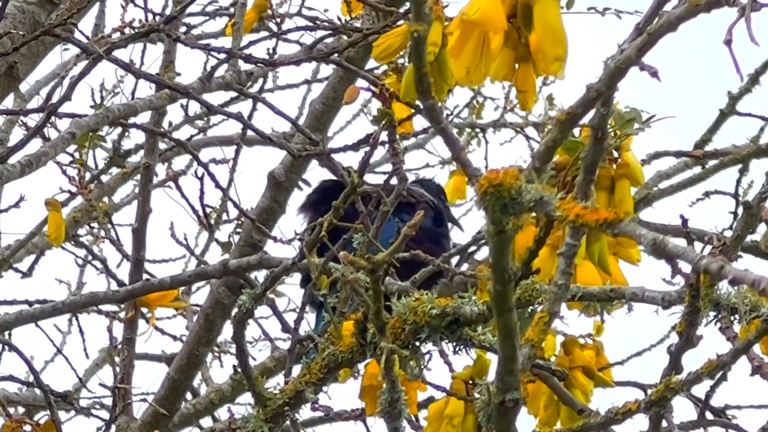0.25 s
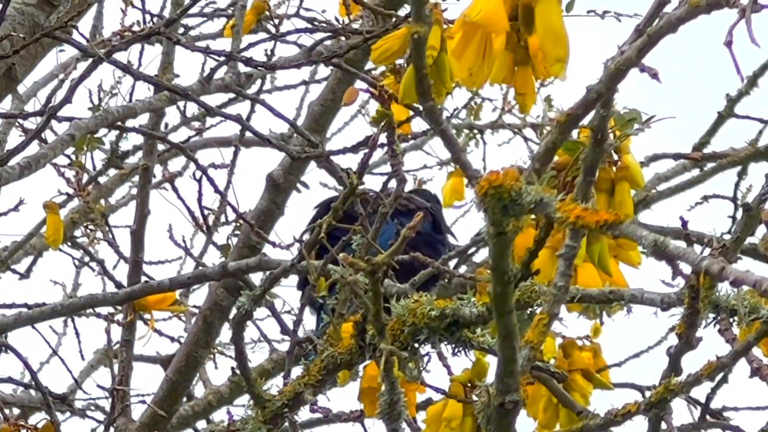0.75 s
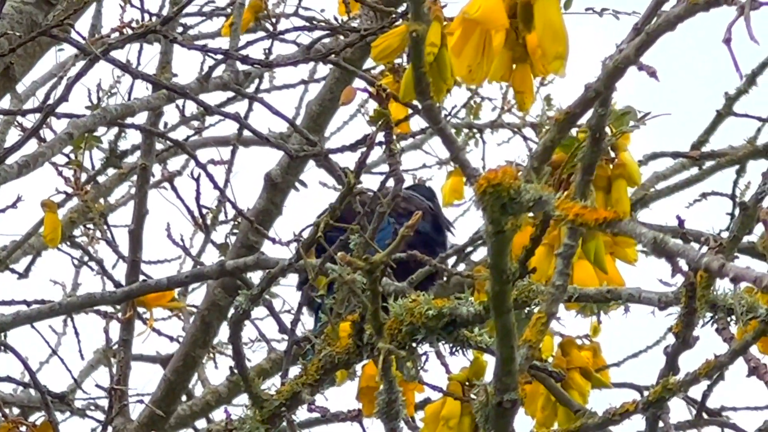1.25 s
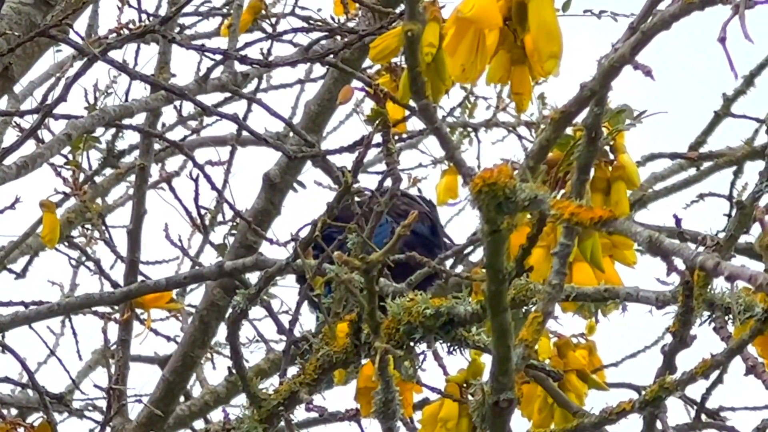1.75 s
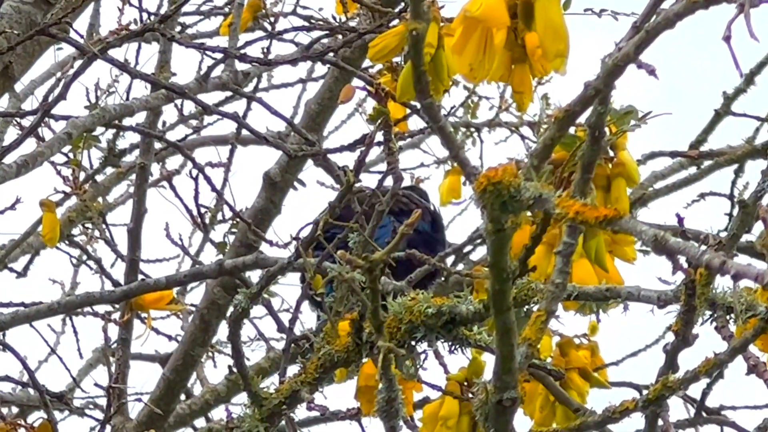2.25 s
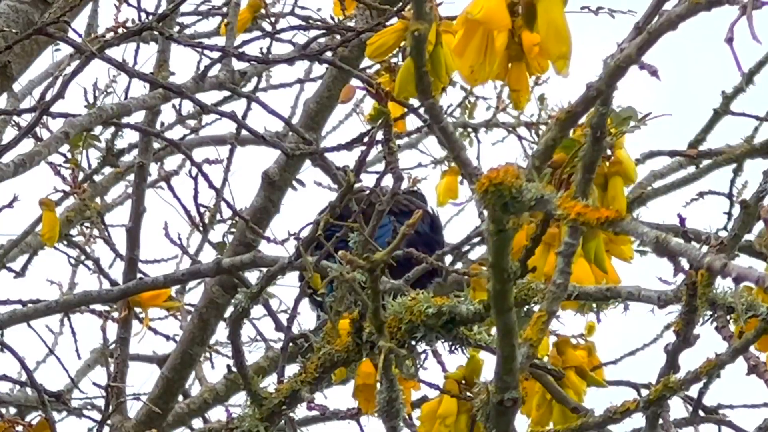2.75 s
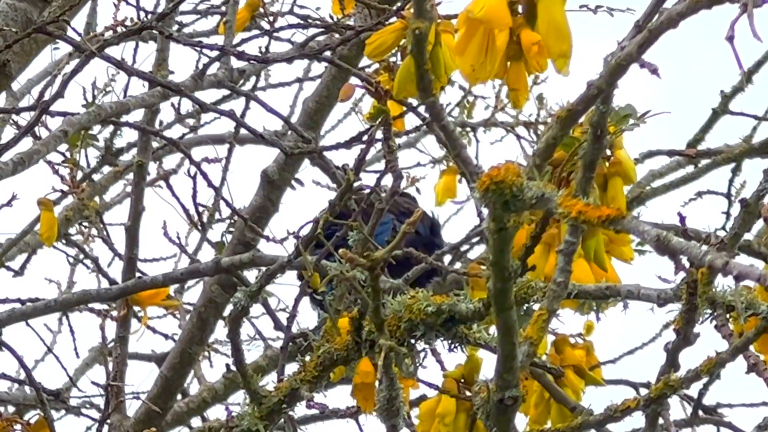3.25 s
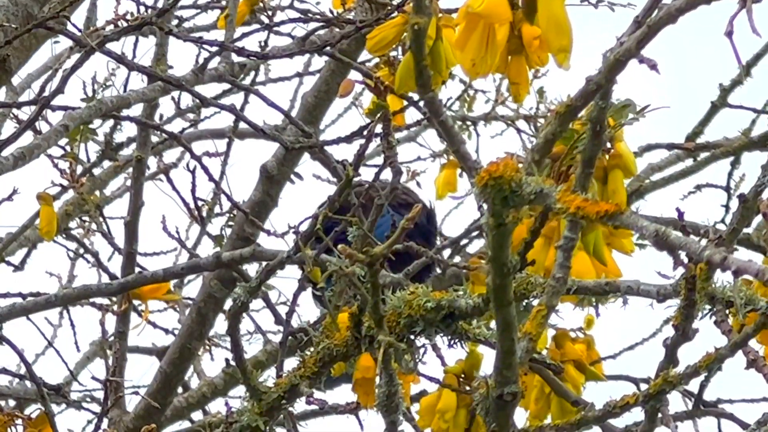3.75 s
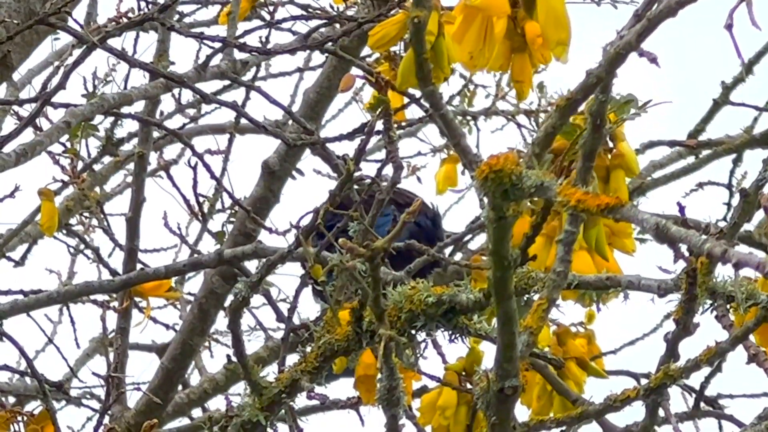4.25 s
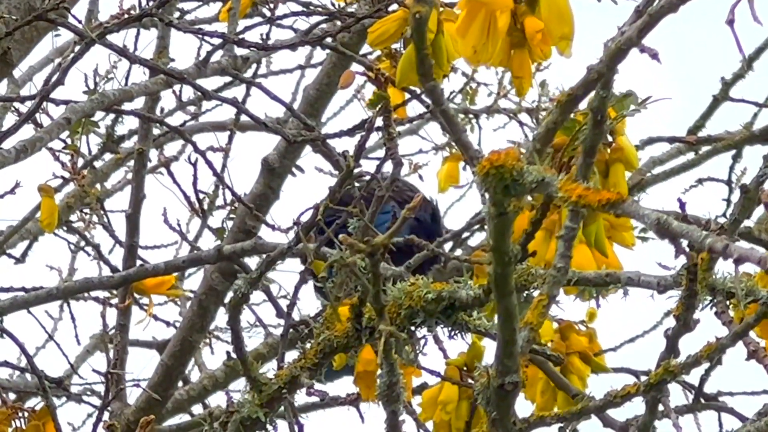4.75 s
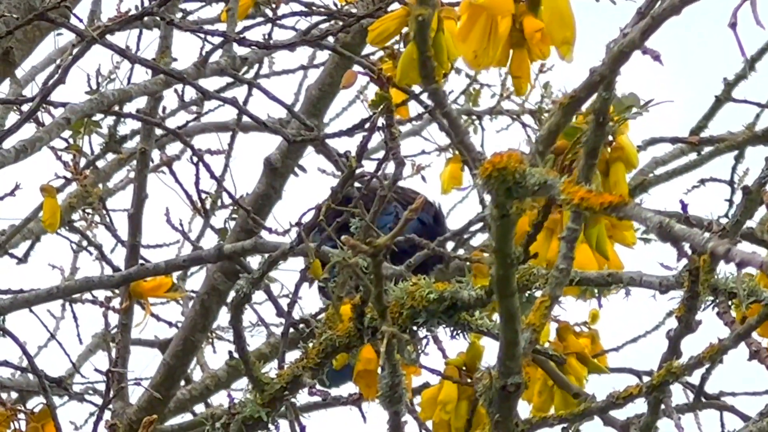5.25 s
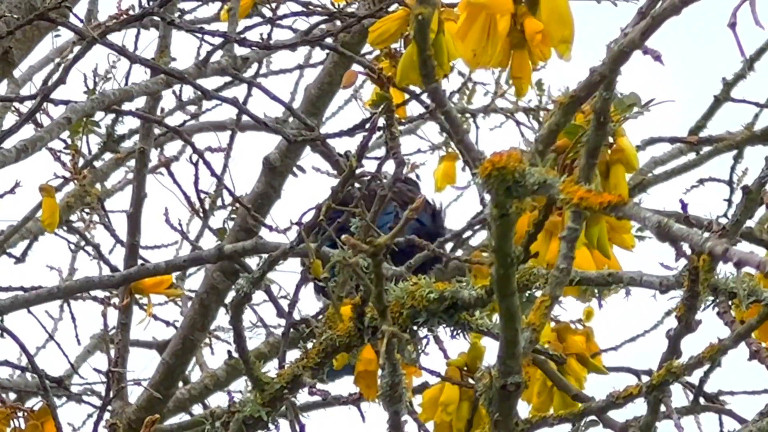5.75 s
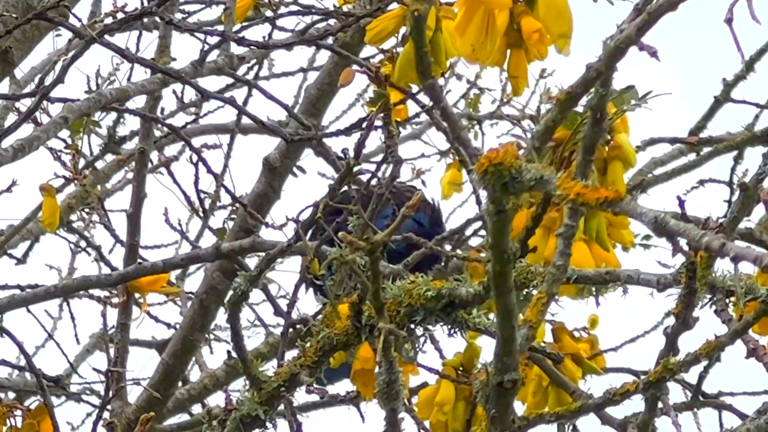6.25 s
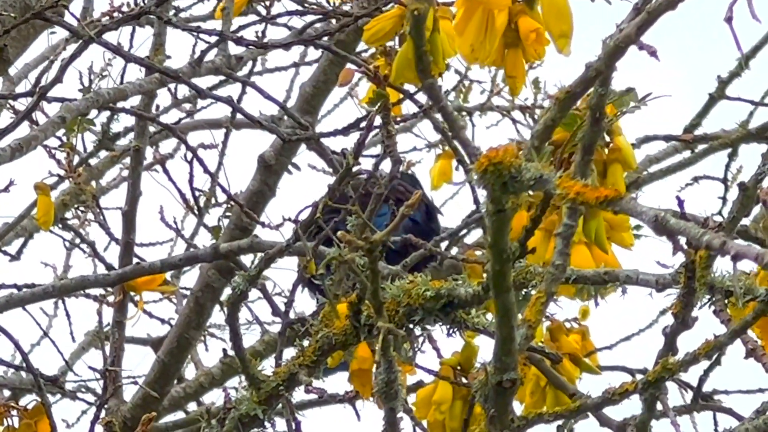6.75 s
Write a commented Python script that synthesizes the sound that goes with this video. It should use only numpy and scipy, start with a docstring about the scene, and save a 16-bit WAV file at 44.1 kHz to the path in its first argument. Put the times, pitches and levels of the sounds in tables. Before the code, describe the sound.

Outdoors in a tree, a bird delivers a rapid, ever-changing song of whistles, chirps, clicks, trills and one scratchy rasp, each briefly blurred by echoes from the branches. Gusts buffet the microphone with dull low thuds around the middle and again near the end, where the strongest comes. Noise suppression leaves the pauses very quiet over a barely audible rumble.

```python
"""In a tree outdoors, a songbird sings whistles, glides, trills and rasps, and the branches scatter them.
Its tones are gliding sine partials; its scrapes and rasp are noise filtered by resonances.
Wind buffets the microphone: gusts of low noise, with decaying sines as thumps, over a faint far rumble.
Noise suppression lowers weak treble and keeps the gaps almost silent."""
import sys
import numpy as np
from scipy import signal
from scipy.fft import rfft, irfft
from scipy.io import wavfile
from scipy.ndimage import uniform_filter1d

SR = 44100
rng = np.random.default_rng(int(sys.argv[2]) if len(sys.argv) > 2 else 0)


def generate_wav(signal):
    """Clip the signal to [-1, 1] and save it as 16-bit WAV at the path in sys.argv[1]."""
    frames = np.transpose(np.atleast_2d(signal))
    scaled = np.clip(frames, -1, 1) * 32767
    pcm = np.round(scaled).astype(np.int16)
    wavfile.write(sys.argv[1], SR, pcm)


N = 308259

# Source levels are relative: echoes, gains and suppression act on them afterwards.
# Spectra are relative densities; each shaped noise is then brought to rms 1.

# Far rumble: (frequency [Hz], density [dB])
AIR_SPECTRUM = [(30, -23.5), (100, -10.5), (250, -8.5), (600, -5), (950, -17.5), (2000, -11.5),
                (2800, -27.5), (16000, -40)]
AIR_DB = -72.5
# Steady whistles: (time [s], length [s], pitch [Hz], peak level [dB])
HOLDS = [(.025, 0.076, 703, -48), (1.648, .067, 4440, -38.5), (2.81, .06, 3600, -46), (4.8, .07, 3650, -66)]
HOLD_ENDS_DB, HOLD_SAG = -20, .02  # both ends are softer, and sharper by this share of the pitch
# Decay of the echoes: (frequency [Hz], t60 [s])
ECHO_DECAY = [(800, 0.23), (3000, .19), (10000, .19)]
# Branches return little of the lowest notes: (frequency [Hz], gain [dB])
ECHO_SPECTRUM = [(1200, -10), (3000, -1), (8000, -1)]
WET_DB = 1.5  # echoes against the direct sound, before ECHO_SPECTRUM
# Whistles that move fast and then level off: (time [s], length [s], start pitch [Hz], end pitch [Hz],
# end level [dB], start level re end [dB], overtones re first partial at the loudest point [dB] ..)
SCOOPS = [(0.096, .04, 2020, 2900, -42, -16, 0), (.135, .045, 2500, 3200, -42, -10, -2.5),
          (0.637, 0.032, 1480, 1691, -80, -5, 20, 35), (.668, .035, 4200, 5150, -44, -14),
          (1.478, .04, 2900, 3550, -60, -16, 20), (1.515, .035, 3000, 3600, -60, -10, 17.5),
          (1.565, 0.026, 3277, 3550, -61, -4, 29), (1.724, 0.045, 6000, 7220, -38.5, -16),
          (1.847, 0.037, 5690, 7370, -33, -22), (4.325, 0.072, 1864, 7900, -40, -34),
          (4.412, .069, 1903, 8116, -37.5, -23), (4.492, 0.055, 2200, 7746, -39, -22),
          (4.774, .022, 4600, 6500, -45, -2), (4.79, .075, 6300, 7400, -48, 3),
          (5.087, 0.041, 2220, 2691, -69, -22, 30, 6.5)]
SCOOP_BEND, SCOOP_SWELL = 3.6, 3.  # powers of the share of time left, for pitch and level
# Gusts: (time [s], half length to half amplitude [s], level [dB])
GUSTS = [(0.403, 0.016, -60.5), (0.583, 0.019, -60.5), (1.346, 0.055, -62.5), (1.455, 0.019, -53.5),
         (1.537, 0.015, -46.5), (1.66, 0.038, -59), (1.851, 0.026, -57), (2.248, 0.021, -57),
         (2.889, 0.038, -43.5), (3.138, 0.041, -43.5), (3.341, 0.081, -41.5), (3.726, 0.068, -28.5),
         (4.219, 0.027, -51), (4.747, 0.029, -37), (4.902, 0.045, -43), (5.265, 0.043, -49),
         (5.651, 0.027, -44.5), (6.282, 0.075, -28), (6.438, 0.034, -24), (6.885, 0.017, -52.5)]
# Wind noise at every gust: (frequency [Hz], density [dB])
WIND_SPECTRUM = [(20, -44.5), (60, 10.5), (110, 10.5), (200, 0.5), (400, -18), (800, -51.5), (1300, -93)]
# Brighter wind noise that favours strong gusts: (frequency [Hz], density [dB])
ROAR_SPECTRUM = [(100, -31.5), (250, -1.5), (550, -12.5), (900, -43.5), (1300, -98)]
# Single blows on the diaphragm: (time [s], level before decay [dB], pitch [Hz])
THUMPS = [(3.287, -16, 139), (3.368, -16, 121), (3.667, -10.5, 181), (3.765, -13, 108), (3.139, -26, 90),
          (4.75, -17, 118.3), (4.86, -12.5, 159.6), (6.248, -14.5, 197.5), (6.304, -11.5, 107),
          (6.402, -2.5, 168.4)]
SNAP_S, SNAP_DB = 6.408, -29.5
# Straight slides: (time [s], length [s], start pitch [Hz], end pitch [Hz],
# end level [dB], start level re end [dB], overtones re first partial at the loudest point [dB] ..)
SLIDES = [(.42, 0.016, 2775, 2398, -43, -30.5, -2), (0.442, .012, 1097, 1100, -36, -14),
          (.925, .062, 3900, 2650, -36, -14), (1.038, 0.038, 4064, 2940, -38, -20, -9, -21.5),
          (1.088, .036, 3650, 2900, -38, -10, -10, -20), (1.222, .038, 3450, 2900, -32, -8, -13, -25),
          (1.18, 0.036, 3544, 2800, -30, -16, -11.5, -31), (1.592, 0.034, 6110, 7110, -37.5, -3.5),
          (1.72, .01, 3868, 4300, -37, -12.5), (1.79, 0.052, 4520, 4480, -50, -6),
          (1.892, 0.008, 7585, 5644, -34, -12), (2.564, 0.057, 3450, 2480, -34.5, -14),
          (3.0, 0.02, 6710, 6100, -46.5, -6), (3.337, 0.017, 630, 601, -43.5, -18.5),
          (4.402, .014, 900, 760, -55, -3), (4.882, .024, 5800, 4200, -40, -3),
          (4.912, .018, 5600, 4000, -44, 5), (4.958, .022, 6300, 3850, -40, -5),
          (4.988, .019, 5700, 3850, -44, 11), (5.935, 0.0097, 4140, 4310, -52, -2),
          (6.257, 0.059, 3088, 4070, -47, 4), (6.353, 0.042, 3320, 4140, -41, -32.5, -2.5),
          (6.976, 0.022, 1058, 1102, -20, -32, -41.5, -19)]
SLIDE_SWELL = 1.8  # power of the share of time left
# Free glides: ([overtones re first partial at the loudest point [dB]],
# [(time [s], pitch [Hz], level [dB]), ..])
GLIDES = [ ([], [(.483, 2720, -52), (.5, 2720, -37), (.54, 2680, -36), (.59, 2790, -36)]), ([],
          [(.74, 3250, -54), (.765, 3254, -34), (.8, 3222, -48), (.86, 2085, -40), (.9, 1538, -70),
          (.96, 1020, -68)]), ([], [(.808, 5860, -54.5), (.85, 4420, -63), (.92, 3210, -38),
          (.945, 2640, -36)]), ([0], [(1.335, 4050, -54), (1.36, 3900, -48), (1.381, 4150, -42),
          (1.39, 1776, -39)]), ([-46], [(1.926, 1319, -23), (1.96, 1270, -19), (1.985, 1228, -21),
          (2.016, 1270, -30)]), ([], [(1.926, 1239, -46), (1.945, 1217, -16.5), (1.985, 1138, -27),
          (2.016, 1181, -32)]), ([], [(3.08, 6710, -56.5), (3.1, 6606, -46.5), (3.25, 6450, -62),
          (3.276, 6200, -50)]), ([18, -2], [(3.948, 1050, -64), (3.962, 1620, -57), (3.976, 1810, -54),
          (4.02, 1850, -50.5), (4.028, 1840, -60)]), ([], [(5.135, 4220, -59), (5.15, 3980, -49),
          (5.19, 2945, -42.5), (5.25, 2080, -57.5)]), ([-10.5], [(5.247, 2130, -49), (5.32, 1874, -48.5),
          (5.39, 1836, -58), (5.44, 2336, -55), (5.5, 2487, -44), (5.535, 2248, -46),
          (5.556, 1750, -50.5)]), ([], [(5.247, 9180, -40), (5.27, 8400, -49), (5.3, 6600, -49.5),
          (5.34, 6310, -48.5), (5.385, 5995, -54), (5.425, 6630, -50.5), (5.46, 8660, -29),
          (5.495, 9400, -35.5), (5.52, 9820, -48), (5.55, 8920, -26.5), (5.575, 7280, -50)]), ([],
          [(5.45, 10600, -58), (5.49, 11720, -58), (5.515, 10480, -41), (5.55, 11300, -46)]), ]
OVERTONE_GROWTH = .55  # extra dB in the overtones for each dB of effort
FLUTTER_DB = 2.5  # greatest rms unevenness of level, in fast glides
# Scrapes of air: (time [s], decay length [s], centre [Hz], half width to 1/e [Hz], level [dB])
SCRAPES = [(1.322, 0.014, 5570, 675, -42.5), (1.322, 0.03, 8750, 600, -44), (1.328, 0.014, 10530, 300, -43),
           (1.915, 0.025, 7850, 900, -41.5), (1.929, .03, 9070, 577, -45.5), (3.95, .02, 4100, 600, -50),
           (4.434, .026, 10200, 500, -63), (4.337, .02, 5400, 500, -56), (5.556, .015, 6000, 1500, -58),
           (4.752, 0.017, 8890, 400, -45.5), (4.757, 0.035, 10770, 683, -58.5),
           (6.431, 0.026, 8430, 493, -52), (1.949, 0.024, 5100, 298, -57), (5.12, 0.024, 8670, 296, -56),
           (3.603, 0.018, 8330, 805, -33)]
# Both sides of the syrinx at once: (time [s], low voice [Hz], high voice [Hz], level [dB])
CHORD = [(2.409, 1672, 2296, -63), (2.431, 1653, 2331, -35), (2.462, 1626, 2357, -46),
         (2.497, 1694, 2401, -34), (2.505, 1737, 2340, -52)]
# Falling whistles of the trills and the rattle:
# (time [s], length [s], top pitch [Hz], bottom pitch [Hz], level midway [dB])
DROPS = [(2.646, 0.019, 4597, 3667, -43), (2.674, 0.025, 4560, 3450, -40), (2.706, 0.031, 5000, 3400, -38),
         (2.743, 0.034, 5100, 3400, -39), (2.78, 0.034, 4900, 3450, -39), (3.038, .028, 9260, 7910, -50),
         (3.108, 0.027, 9560, 8220, -44.5), (3.145, .03, 9200, 7900, -49), (3.18, 0.02, 9030, 7940, -51),
         (3.207, 0.038, 9360, 7970, -48), (3.277, .009, 6600, 5250, -49), (3.287, 0.008, 4500, 3500, -52),
         (3.298, 0.011, 2500, 1600, -52), (3.3, 0.025, 4500, 1800, -50), (3.31, 0.009, 4800, 3700, -49),
         (5.99, 0.033, 6380, 3970, -46), (6.039, 0.037, 6900, 4110, -44), (6.101, 0.04, 6600, 4200, -48)]
# Course of the rasp: (time [s], level [dB])
RASP = [(3.612, -52.5), (3.636, -26.5), (3.721, -36), (3.93, -37), (3.962, -52)]
# Throat resonances with the beak wide: (frequency [Hz], density [dB])
RASP_WIDE = [(900, -61.5), (1600, -24.5), (2400, -30), (3150, -12), (4300, -32), (5800, -6.5), (6900, -9.5),
             (8100, 1.5), (9600, -13.5), (10200, -39.5), (11000, -22), (11700, -30), (12300, -80),
             (14000, -66), (15400, -20)]
# Change of that spectrum as the beak closes: (frequency [Hz], gain [dB])
RASP_CLOSING = [(1700, -5), (2900, -17), (4400, 16), (5800, -1)]
BEAK_CLOSES_S, BEAK_TAKES_S = 3.67, .09  # start and duration of closing
# Clucks: (time [s], length [s], final pitch [Hz], peak level [dB])
CLUCKS = [(5.651, 0.058, 1021, -42), (5.794, 0.034, 992, -44)]
# Cluck partials 2 to 5 re first partial at the loudest point: (level [dB])
CLUCK_OVERTONES_DB = [8, 2.5, -4.5, -8]
CLUCK_START, CLUCK_PEAK = .916, .6  # starting share of final pitch; loudest share of length
CLUCK_ARCH_DB = -14  # change of level half a length away from the peak
# Phase between the microphone ports: (frequency [Hz], lead of the left port [rad])
PORTS = [(100, .42), (2000, .55), (6800, .37), (8500, 1.3), (12000, 1.1)]
# Nominal threshold of noise suppression: (frequency [Hz], level [dB])
SUPPRESSION = [(700, -130), (1100, -87), (2500, -88.0), (3500, -88),
               (10000, -80.0), (12500, -61.5), (15000, -82.5)]
EDGE_HZ = 15800  # upper band limit


def gain_of(db):
    """Definition of level: an amplitude ratio is ten to the power dB / 20."""
    return 10 ** (np.asarray(db) / 20)


def evened(x):
    """Normalisation of mean power: rms becomes 1."""
    return x / np.sqrt(np.mean(x ** 2) + 1e-20)


def read(points, hz):
    """Interpolation on a logarithmic frequency axis."""
    f, value = np.transpose(points)
    return np.interp(np.log(hz + 1), np.log(f + 1), value)


def add(mix, s, sound):
    """Superposition: adds a sound to the mix from time s [s]."""
    part = mix[round(s * SR):][:len(sound)]
    part += sound[:len(part)]


def filtered(x, points):
    """Linear filtering: multiplies the spectrum by a table of gains [dB]."""
    gain = gain_of(read(points, np.fft.rfftfreq(x.shape[-1], 1 / SR)))
    return irfft(rfft(x) * gain, x.shape[-1])


def coloured(x, points):
    """Spectral shaping at constant power: filters, then sets rms to 1."""
    return evened(filtered(x, points))


def note(overtones_db, rows):
    """Phase is the integral of frequency: a trembling glide whose overtones grow with effort."""
    s, hz, db = np.transpose(rows)
    t = np.arange(s[0], s[-1], 1 / SR)
    level_db = np.interp(t, s, db)
    tremor = evened(uniform_filter1d(rng.standard_normal(SR // 2), 60))[:len(t)]
    pitch = uniform_filter1d(np.interp(t, s, hz), 150, mode="nearest")
    haste = abs(np.gradient(np.log(pitch))) * SR  # fast glides are unsteady
    pitch = pitch * (1 + np.minimum(0.0048 + 0.0004 * haste, .05) * tremor)

    wander = signal.oaconvolve(rng.standard_normal(SR // 2), signal.windows.blackman(300), "same")
    flutter_db = FLUTTER_DB * np.tanh(haste / 8) * evened(wander)[:len(t)]

    angle = 2 * np.pi * np.cumsum(pitch) / SR
    effort = gain_of(OVERTONE_GROWTH * (level_db - db.max()))
    overtones = sum(gain_of(d) * np.sin(k * angle) for k, d in enumerate(overtones_db, 2))
    tone = np.sin(angle) + effort * overtones
    edges = np.sin(np.pi / 2 * np.clip(np.minimum(t - s[0], s[-1] - t) / 0.0043, 0, 1))
    return s[0], np.sqrt(2) * gain_of(level_db + flutter_db) * edges * tone


def shaped(overtones_db, s, length, hz_of, db_of):
    """Parametric motion: pitch and level are functions of the share of time left."""
    left = np.linspace(1, 0, num=24)
    rows = np.transpose([s + length * (1 - left), hz_of(left), db_of(left)])
    return note(overtones_db, rows)


def air():
    """Partial coherence: mostly shared noise makes a far rumble that flickers a little."""
    noise = rng.standard_normal((3, N))
    flicker_db = 1.5 * evened(uniform_filter1d(noise[2], 2000))
    both = [coloured(noise[0] + side * 0.11 * noise[1], AIR_SPECTRUM) for side in (1, -1)]
    return gain_of(AIR_DB + flicker_db) * np.array(both)


def hold(s, length, hz, db):
    """Amplitude envelope: a nearly steady pitch under an arch of level."""
    return shaped([], s, length,
                  lambda left: hz * (1 + HOLD_SAG * (2 * left - 1) ** 2),
                  lambda left: db + HOLD_ENDS_DB * (2 * left - 1) ** 2)


def surroundings(x, wet_db):
    """Multiple scattering: dense echoes, alike at both ports, decay exponentially in each band."""
    echoes = np.zeros((2, SR // 2))
    # one echo of random sign at a random place in every 20 samples
    at = np.arange(100, SR // 2 - 20, 20) + rng.integers(0, 20, (2, (SR // 2 - 101) // 20))
    np.put_along_axis(echoes, at, rng.choice([-1., 1.], at.shape), 1)
    echoes = echoes[0] + .12 * echoes[1] * np.array([[1], [-1]])

    hz, t, z = signal.stft(echoes, SR, nperseg=256)
    decay = gain_of(-60 * t / read(ECHO_DECAY, hz)[:, None])
    tail = signal.istft(z * decay, SR, nperseg=256)[1]
    tail *= gain_of(wet_db) / np.linalg.norm(tail[0])
    tail = filtered(tail, ECHO_SPECTRUM)
    tail[:, 0] = 1  # the direct sound
    return signal.fftconvolve(x[None], tail / np.linalg.norm(tail[0]), axes=1)[:, :N]


def scoop(s, length, from_hz, to_hz, db, start_db, *overtones_db):
    """Decelerating frequency modulation: pitch and level approach their ends early."""
    return shaped(overtones_db, s, length,
                  lambda left: to_hz + (from_hz - to_hz) * left ** SCOOP_BEND,
                  lambda left: db + start_db * left ** SCOOP_SWELL)


def wind():
    """Turbulent pressure: lumpy low noise in Gaussian gusts, with damped blows on the diaphragm."""
    t = np.arange(N) / SR
    gusts = sum(gain_of(db - 6.03 * ((t - s) / half) ** 2) for s, half, db in GUSTS)
    lumps_db = 5.2 * evened(uniform_filter1d(uniform_filter1d(rng.standard_normal(N), 400), 400))
    out = coloured(rng.standard_normal(N), WIND_SPECTRUM) * gusts * gain_of(lumps_db)
    roar = coloured(rng.standard_normal(N), ROAR_SPECTRUM) * gain_of(lumps_db)
    out += gain_of(6.5) * gusts ** 1.578 * roar  # strong gusts are brighter

    t = t[:SR // 4]
    attack = 1 - np.exp(-(t / 0.0016) ** 2)
    for s, level_db, hz in THUMPS:
        decay = gain_of(level_db - 60 * t / 0.049)  # t60 is 0.049 s
        add(out, s, decay * np.sin(2 * np.pi * hz * t) * attack)
    snap = np.exp(-(t / 0.00024 - 2.) ** 2)
    add(out, SNAP_S, gain_of(SNAP_DB) * snap)  # the hardest blow snaps
    return out


def slide(s, length, from_hz, to_hz, db, start_db, *overtones_db):
    """Linear frequency modulation: pitch moves evenly while the level swells or fades."""
    return shaped(overtones_db, s, length,
                  lambda left: to_hz + (from_hz - to_hz) * left,
                  lambda left: db + start_db * left ** SLIDE_SWELL)


def scrape(s, length, hz, width_hz, db):
    """Resonant filtering: a puff of noise excites one resonance of the throat."""
    t = np.arange(4096) / SR
    noise = rfft(rng.standard_normal(4096))
    resonance = np.exp(-((np.fft.rfftfreq(4096, 1 / SR) - hz) / width_hz) ** 2)
    puff = evened(irfft(noise * resonance))
    attack = 1 - np.exp(-(t / 0.00074) ** 2)
    return s, gain_of(db) * puff * np.exp(-(t / length) ** 4) * attack


def chord():
    """Nonlinear coupling: two voices give their own tones, their octaves and their sum."""
    s, low_hz, high_hz, db = np.transpose(CHORD)
    t = np.arange(s[0], s[-1], 1 / SR)
    low, high = (2 * np.pi * np.cumsum(np.interp(t, s, hz)) / SR for hz in (low_hz, high_hz))
    tone = np.sin(low) + gain_of(-0.3) * np.sin(high) + gain_of(-2.0) * np.sin(low + high)
    tone += gain_of(-33.5) * np.sin(2 * low) + gain_of(-31.5) * np.sin(2 * high)
    edges = signal.windows.tukey(len(t), .06)
    return s[0], np.sqrt(2) * gain_of(np.interp(t, s, db)) * edges * tone


def drop(s, length, top_hz, bottom_hz, db):
    """Piecewise frequency modulation: pitch falls fast, then flattens, loudest low down."""
    knee_hz = bottom_hz + .35 * (top_hz - bottom_hz)
    return note([], [(s, top_hz, db - 10.5),
                     (s + .5 * length, knee_hz, db),
                     (s + length, bottom_hz, db + 3.0)])


def rasp():
    """Amplitude-modulated turbulence: uneven puffs of air, refiltered as the beak closes."""
    s, db = np.transpose(RASP)
    t = np.arange(s[0], s[-1], 1 / SR)
    noise = rng.standard_normal((2, SR // 2))[:, :len(t)]
    puffs = noise[0] * gain_of(3.2 * evened(uniform_filter1d(noise[1], 120)))
    wide = coloured(puffs, RASP_WIDE)
    closed = coloured(wide, RASP_CLOSING)
    closing = np.clip((t - BEAK_CLOSES_S) / BEAK_TAKES_S, 0, 1)
    voiced = evened(np.sqrt(1 - closing) * wide + np.sqrt(closing) * closed)
    return s[0], gain_of(np.interp(t, s, db)) * voiced * signal.windows.tukey(len(t), .01)


def cluck(s, length, hz, db):
    """Harmonic series: a low note rich in overtones, rising a little."""
    return shaped(CLUCK_OVERTONES_DB, s, length,
                  lambda left: hz * (1 - (1 - CLUCK_START) * left ** 2),
                  lambda left: db + CLUCK_ARCH_DB * (2 * (left - 1 + CLUCK_PEAK)) ** 2)


def scene():
    """Superposition of the bird in its surroundings, the wind and the air."""
    bird = np.zeros(N)
    song = [(scoop, SCOOPS), (slide, SLIDES), (hold, HOLDS), (cluck, CLUCKS),
            (note, GLIDES), (scrape, SCRAPES), (drop, DROPS)]
    for sing, rows in song:
        for row in rows:
            add(bird, *sing(*row))
    add(bird, *chord())
    add(bird, *rasp())
    return gain_of(6.5) * surroundings(bird, WET_DB) + wind() + air()


def record(dry):
    """Phase difference and spectral gating: two ports, noise suppression, then band limits."""
    hz, t, z = signal.stft(dry, SR, nperseg=512, noverlap=384)
    z = z * np.exp(.5j * np.array([[1], [-1]]) * read(PORTS, hz))[:, :, None]

    # power shared by both ports, smoothed over frequency and time
    power = uniform_filter1d(uniform_filter1d((abs(z) ** 2).mean(0), 3, 0), 3, 1)
    weak = gain_of(read(SUPPRESSION, hz))[:, None] ** 2
    suppression = power ** 1.3236 / (power ** 1.2896 + weak ** 1.227)
    least = gain_of(-7.5) * (power < weak * gain_of(-50.))  # gain floor for the very weakest bins
    z *= np.maximum(suppression, least)

    clean = signal.istft(z, SR, nperseg=512, noverlap=384)[1][:, :N]
    clean = signal.sosfilt(signal.butter(3, 55, "high", fs=SR, output="sos"), clean)  # bass cut
    lowpass = signal.firwin(511, EDGE_HZ, window=("kaiser", 9), fs=SR)
    return signal.oaconvolve(clean, lowpass[None], "same")


dry = scene()
out = record(dry)
generate_wav(out)
```